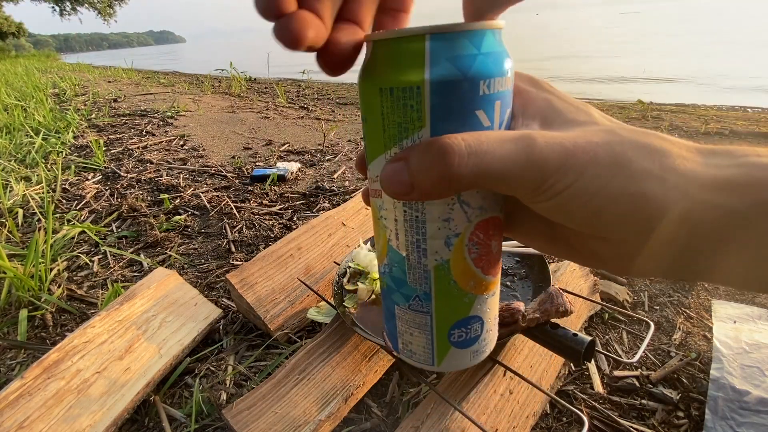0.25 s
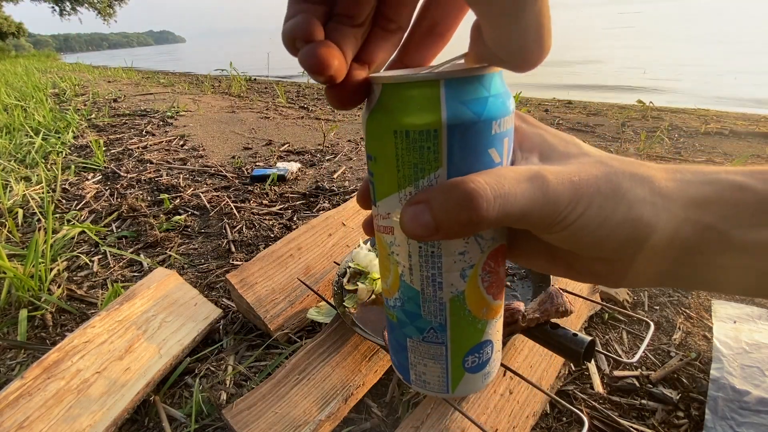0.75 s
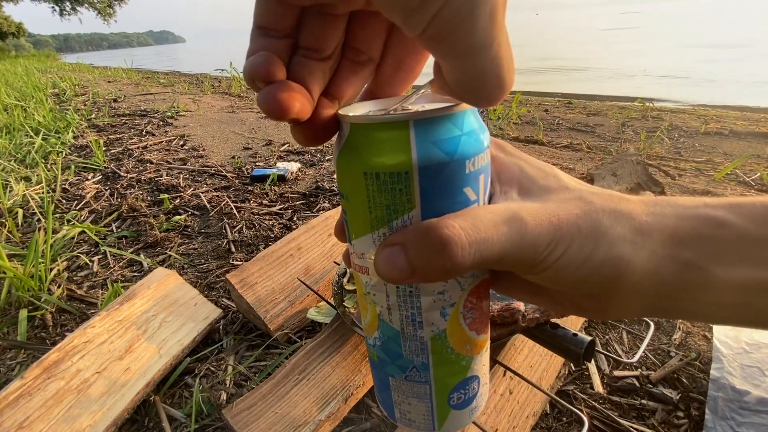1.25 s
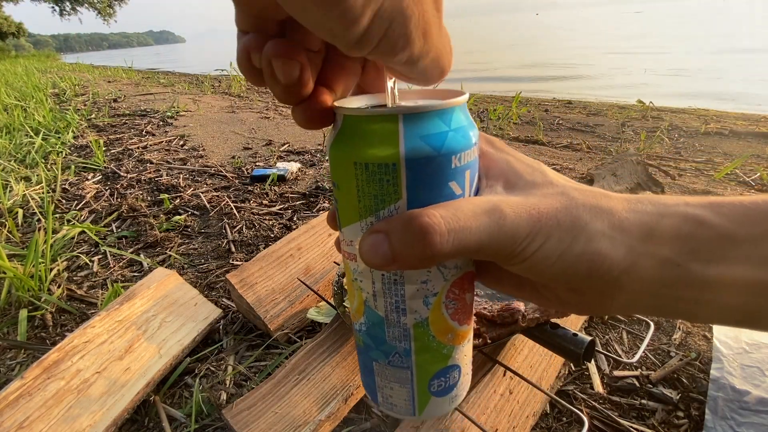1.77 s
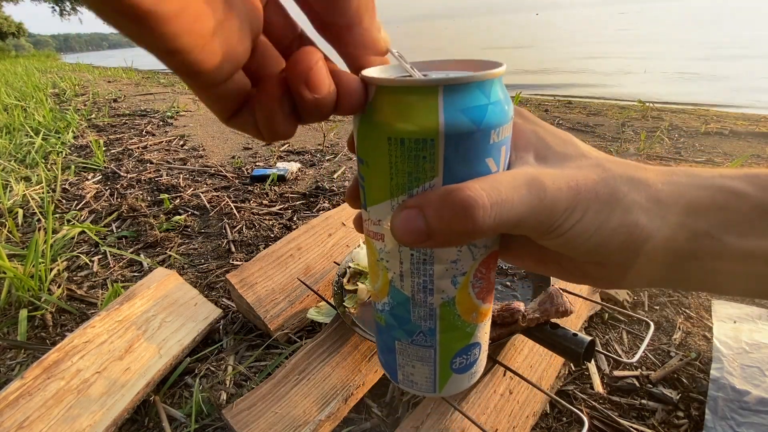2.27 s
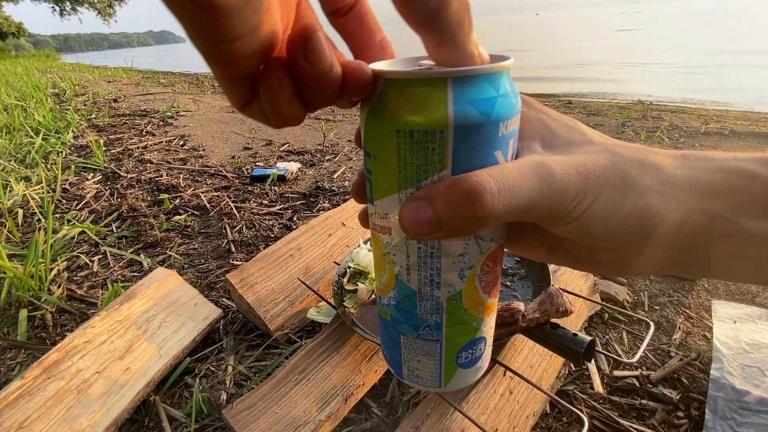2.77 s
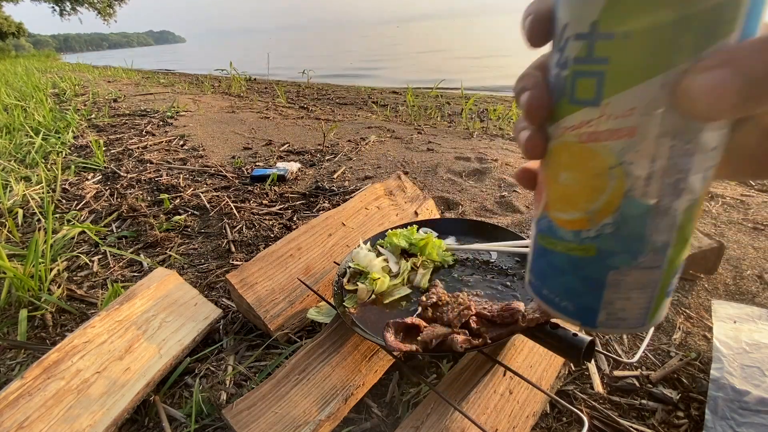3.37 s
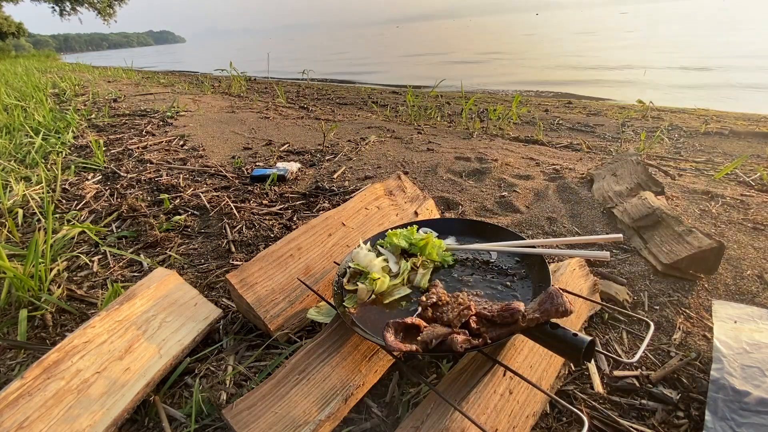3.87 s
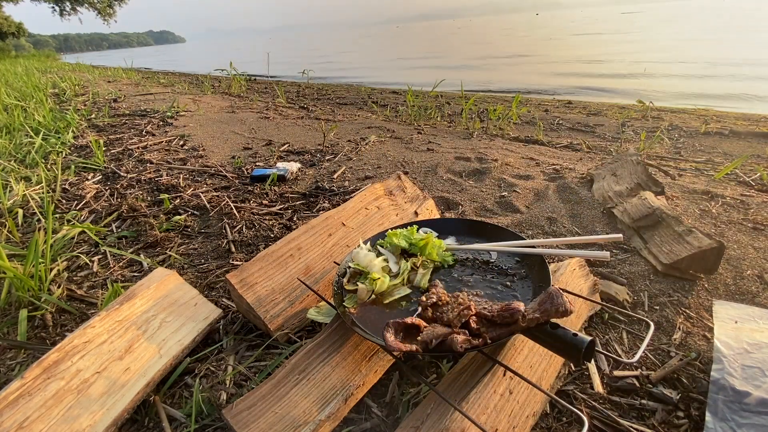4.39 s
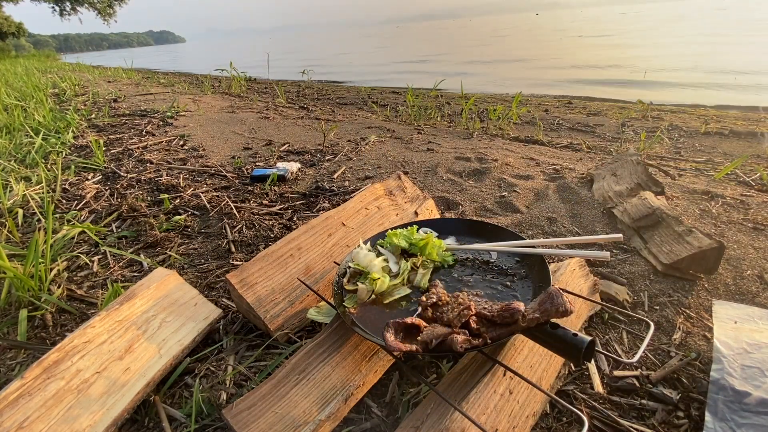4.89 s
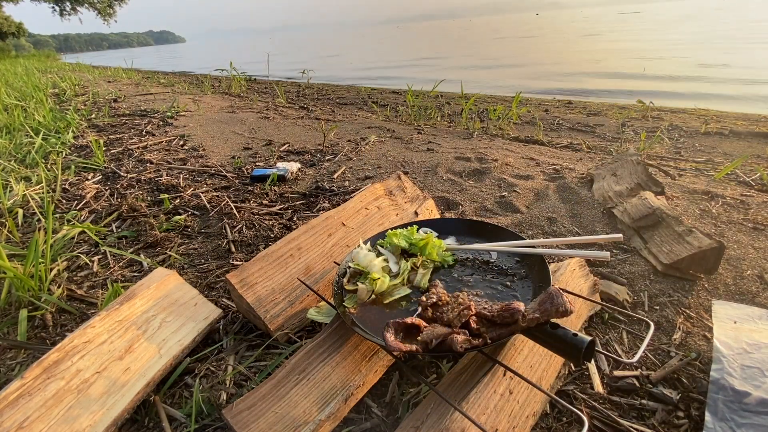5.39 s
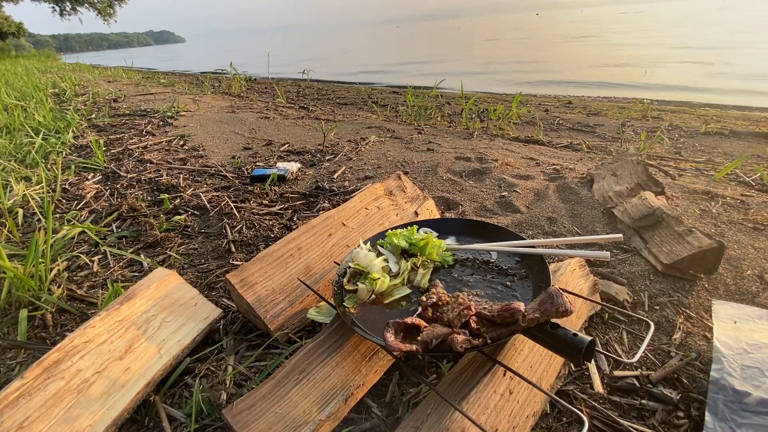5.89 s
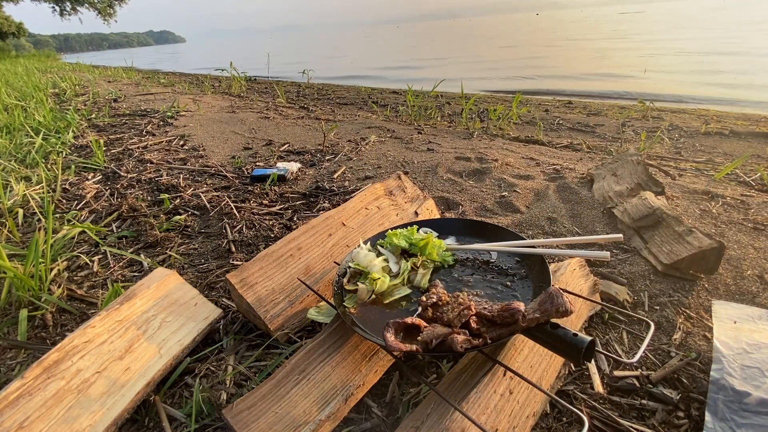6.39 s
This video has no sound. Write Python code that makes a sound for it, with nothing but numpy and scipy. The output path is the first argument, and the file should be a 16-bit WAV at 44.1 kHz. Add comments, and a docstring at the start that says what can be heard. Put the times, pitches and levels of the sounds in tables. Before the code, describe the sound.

Outdoor lake shore, stereo handheld-type pickup. Small wavelets lap and bubble softly with dry twig ticks over a low rumble. Just after one second a can tab snaps and gas spits; around half a second later come very loud crisp lid cracks, then little metal clicks. Later a few snaps, a scraping light can knock to the right, more lapping and plopping, and faint bird chirps.

```python
"""A drink can is opened by hand on a lake shore: the tab clicks, gas jets out, the lid cracks and creaks,
and the can is put down. Struck metal is made of ringing sines, gas of flickering noise bands.
Nearby, small waves lap (noise) and plop (sines climbing in pitch), and twigs tick (short noise snaps).
Far birds whistle (bending sines) over a low rumble, with a thin hiss coming up late.
Two microphone ports pick this up, and a gain control ducks after loud cracks."""
import sys
import numpy as np
from scipy import signal
from scipy.io import wavfile
from scipy.ndimage import uniform_filter1d

SR = 44100
rng = np.random.default_rng(int(sys.argv[2]) if len(sys.argv) > 2 else 0)


def log_audio(samples):
    """Write samples as a 16-bit WAV file to the path given in sys.argv[1]."""
    # one column per channel
    frames = np.atleast_2d(samples).T
    # limit to full scale, then quantise
    limited = np.clip(frames, -1, 1)
    pcm = np.round(limited * 32767).astype(np.int16)
    wavfile.write(sys.argv[1], SR, pcm)


N = 293265   # length in samples
PORT_LAG_S = 0.00022   # sound path between the two ports

# In all tables, levels are those before the gain control.
# A positive lean_db leaves the left port alone and turns the right one down by 1.76 times as many dB;
# a negative lean_db turns the left port down by that many dB.


def amp(db):
    """Turn dB into a gain."""
    return 10 ** (np.asarray(db) / 20)


def rms_one(x):
    """Scale to an rms of 1."""
    return x / np.sqrt(np.mean(x ** 2) + 1e-20)


def in_time(rows, outside=None):
    """Draw each column of a (time, values...) table as a curve with one value per sample."""
    s, *columns = np.transpose(rows)
    t = np.arange(N) / SR
    return [np.interp(t, s, column, outside, outside) for column in columns]


def at_hz(points, hz):
    """Read a (Hz, value) curve at one pitch, along a log pitch axis."""
    pitch_hz, value = np.array(points).T
    return np.interp(np.log(hz), np.log(pitch_hz), value)


def band(x, low_hz, high_hz):
    """Keep only the sound between two pitches (Butterworth band-pass)."""
    edges_hz = [low_hz, min(high_hz, 0.45 * SR)]
    return signal.sosfilt(signal.butter(2, edges_hz, "band", fs=SR, output="sos"), x)


def drift(rate_hz):
    """Random wander of rms 1: noise smoothed twice, so it slows down above rate_hz."""
    step = 40   # samples between the computed points
    r = np.exp(-2 * np.pi * rate_hz * step / SR)
    noise = rng.standard_normal(N // step + 2002)
    slow = signal.lfilter([1], [1, -2 * r, r * r], noise)[2000:]   # skip the filter's start-up
    return np.interp(np.arange(N) / step, np.arange(len(slow)), rms_one(slow))


def ring(x, hz, t60_s):
    """A resonator: a unit click makes it ring as a sine of height 1 that loses 60 dB in t60_s."""
    r = amp(-60 / (t60_s * SR))
    w = 2 * np.pi * hz / SR
    return signal.lfilter([0, np.sin(w)], [1, -2 * r * np.cos(w), r * r], x + 1e-18)


def struck(x, modes, bend=0.04, spread_db=3.5):
    """Ringing modes, each strike with new random strengths and slightly shifted pitches; rms 1."""
    total = 0
    for hz, db, t60_s in modes:
        strength, detune = rng.standard_normal(2)
        total = total + amp(db + spread_db * strength) * ring(x, hz * (1 + bend * detune), t60_s)
    return rms_one(total)


def burst(t60_s, size=3000):
    """Uneven micro-slips: random kicks that swell within a millisecond and die away."""
    t = np.arange(size) / SR
    slips = rng.standard_normal(size) * amp(5 * rng.standard_normal(size))
    swell = 1 - np.exp(-t / 0.0006)
    return slips * amp(-60 * t / max(t60_s, 0.003)) * swell


def plop(hz, t60_s, rise):
    """A bubble: a sine that swells, dies and climbs in pitch as it nears the surface."""
    t = np.arange(round(t60_s * SR)) / SR
    tone = np.sin(2 * np.pi * hz * (t + rise * t ** 2 / t60_s))
    swell = 1 - np.exp(-t / (0.16 * t60_s))
    return tone * amp(-60 * t / t60_s) * swell


def add(out, s, sound, db, lean_db, lag_s=0.0):
    """Place a sound on both ports: the louder one peaks at db, a positive lag_s delays the left one."""
    sound = sound * amp(db) / np.abs(sound).max()
    for side, sign, delay_s in ((0, 1, max(lag_s, 0)), (1, -1.76, max(-lag_s, 0))):
        at = round((s + delay_s) * SR)
        part = out[side, at:at + len(sound)]
        part += sound[:len(part)] * amp(min(sign * lean_db, 0))


# how alike the two ports hear noise: pitch_hz, likeness (1 same, 0 unrelated, -1 opposite)
PORT_LIKENESS = [(60, 0.88), (130, 0.85), (290, 0.082), (640, -0.8), (1500, -0.15), (8000, -0.056),
                 (15000, 0.52)]


def coloured(spectrum, patchy_db, rate_hz):
    """Stereo noise built from bands about 0.4 octave wide, each flickering by itself; rms 1."""
    octaves = np.log2(spectrum[-1][0] / spectrum[0][0])
    edges_hz = spectrum[0][0] * 2 ** np.linspace(0, octaves, int(octaves * 2.5) + 2)
    white = rng.standard_normal((2, 2, N))   # neighbouring bands take turns between two noises
    out = 0
    for k, (low_hz, high_hz) in enumerate(zip(edges_hz, edges_hz[1:])):
        shared, opposed = band(white[k % 2], low_hz, high_hz)
        hz = np.sqrt(low_hz * high_hz)
        alike = np.clip(at_hz(PORT_LIKENESS, hz), -1, 1)
        gain = amp(at_hz(spectrum, hz) + patchy_db * drift(rate_hz))
        stereo = np.sqrt(1 + alike) * shared + np.sqrt(1 - alike) * opposed * [[1], [-1]]
        out = out + gain * stereo
    return rms_one(out)


SLIDE_FROM_S, SLIDE_TO_S, SLIDE_RISE_S, SLIDE_DB = 0.69, 1.4, 0.19, -59


def finger_slide():
    """A finger feels for the tab: soft hiss from 2900 to 4700 Hz that rises, then holds."""
    rise = [(SLIDE_FROM_S, SLIDE_DB - 18), (SLIDE_FROM_S + SLIDE_RISE_S, SLIDE_DB), (SLIDE_TO_S, SLIDE_DB)]
    level_db, = in_time(rise, outside=-150)
    return amp(level_db) * rms_one(band(rng.standard_normal((2, N)), 2900, 4700))


LID_OPEN_S = 1.75   # from here the hollow speaks through the hole
SHUT_THUD, OPEN_THUD = 9, 1   # rms of the broad thud beside the hollow's ring, lid shut and open
HOLLOW_BEND = 0.04   # share by which the hollow's pitch strays from crack to crack
FAR_PORT_LID_DB = -16   # the lid faces the left port

# cracks of finger, tab and lid, with peak levels:
# start_s, lid_db, snap_db, hollow_db, push_db, chatter_t60_s (time to fade by 60 dB)
CRACKS = [(1.073, -3.5, -9, -62, -64, 0.021), (1.352, -46, -52.5, -37, -41.5, 0.016),
          (1.576, -22, -23, -24, -42, 0.011), (1.5805, -2.5, -6, 1, -12, 0.0086),
          (1.5847, -13, -34, -35, -32, 0.0062), (1.6069, -30.5, 1, -5, -52, 0.043),
          (1.6091, 3, -2, -19, -50, 0.009), (1.624, -16.5, -10, -22, -43, 0.018),
          (1.718, -33, -36, -29.5, -48, 0.026), (1.7314, -23, -28, -25, -29, 0.016),
          (1.7403, 3.5, 3.5, -14, -53.5, 0.033), (1.7454, 9.5, 1, 7, -16, 0.009),
          (1.7614, -42, -6, -23, -57.5, 0.016), (1.7683, -15.5, -9, -29, -47, 0.016),
          (1.7788, -15.5, -17, -25, -57, 0.052), (1.795, -26, -25, -32, -70, 0.016),
          (1.8124, -34, -40.5, -32, -70, 0.027), (1.839, -36, -41, -24, -70, 0.04),
          (1.8492, -26.5, -28.5, -31.5, -69, 0.047), (1.901, -23, -50.5, -20, -71, 0.016),
          (1.9647, -37, -34, -31.5, -66, 0.027), (1.9698, -15, -20, -27.5, -67, 0.027),
          (2.0695, -59, -64, -41, -66, 0.014), (2.0786, -26, -20.5, -22, -58.5, 0.013),
          (2.2142, -53, -59, -27, -67, 0.038), (2.2233, -35, -57.5, -34, -56, 0.027),
          (2.2819, -51, -66, -24.5, -69, 0.054), (2.2945, -57, -64, -29, -65, 0.017),
          (2.581, -32, -39, -30.5, -48, 0.081), (2.594, -24, -30.5, -48, -59, 0.027),
          (2.7414, -17, -15.5, -14.5, -57, 0.011), (3.3694, -38.5, -56.5, -39.5, -30.5, 0.0079)]
# ringing of the lid, around which each strike strays: pitch_hz, level_db, t60_s
LID_MODES = [(2773, -3.5, 0.022), (3280, 4, 0.025), (3940, -2, 0.013), (4560, -8, .014), (5590, -5, 0.019),
             (6230, -7.5, 0.023)]
# ringing of the air space under the lid, also strayed from: pitch_hz, level_db, t60_s
HOLLOW_MODES = [(1290, 0, .042), (1850, -7, .015)]


def tab():
    """Each crack drives the lid and the hollow below it, with a bright snap and a dull push."""
    # The can is close on the left: lows lead and are louder there, the treble comes round the other way.
    out = np.zeros((2, N))
    for s, lid_db, snap_db, hollow_db, push_db, t60_s in CRACKS:
        chatter = burst(t60_s)

        # each port faces other parts of the lid, so each gets its own strike
        rattle = 1.27 * rms_one(band(chatter, 2200, 5130))
        add(out, s, struck(chatter, LID_MODES) + rattle, lid_db, 40)
        add(out, s, struck(chatter, LID_MODES) + rattle, lid_db + FAR_PORT_LID_DB, -40, -PORT_LAG_S)

        thud_share = SHUT_THUD if s < LID_OPEN_S else OPEN_THUD
        thud = thud_share * rms_one(band(band(chatter, 1100, 2750), 700, 3000))
        hollow = struck(chatter, HOLLOW_MODES, bend=HOLLOW_BEND) + thud
        add(out, s, hollow, hollow_db, 4.2, -PORT_LAG_S)

        snap = band(chatter, 7500, 14500)
        add(out, s, snap, snap_db, -1.1, PORT_LAG_S)
        push = band(chatter, 120, 1670)
        add(out, s, push, push_db, 11, -PORT_LAG_S)
    return out


SPUTTER_T60_S = 0.027

# escaping gas, first leak then full jet, levels before flicker and port mix: time_s, jet_db, foam_db
GAS_LEVELS = [(1.115, -38, -51), (1.123, -33, -59.5), (1.133, -27, -54.5), (1.14, -18, -26.5),
              (1.146, -9.5, -29.5), (1.208, -26.5, -26), (1.218, -29, -18), (1.245, -55, -29),
              (1.262, -68, -44)]
# tone colour of the jet: pitch_hz, level_db (per Hz, relative)
JET_COLOUR = [(2940, -26.5), (5000, -22), (9150, -22), (10500, -8), (12600, -13), (13300, -12.5),
              (14900, -20.5), (16200, -11), (16500, -37)]
# tone colour of the foam: pitch_hz, level_db (per Hz, relative)
FOAM_COLOUR = [(150, -31), (250, -20.5), (663, -2.5), (806, -11), (1840, -2), (2360, 9.5), (2870, -16.5),
               (7000, -33.5), (9100, -61), (15400, -120)]
# big foam bubbles bursting at the seam: start_s, peak_db, pitch_hz (at the start)
FOAM_BUBBLES = [(1.15, -25.5, 1750), (1.164, -27, 880), (1.188, -25.5, 703), (1.194, -24, 1900),
                (1.211, -25, 627.3), (1.215, -32, 1630), (1.232, -23, 1500)]


def gas():
    """A bright jet of noise through the torn seam; foam sputters below it in lumps."""
    jet_db, foam_db = in_time(GAS_LEVELS, outside=-150)
    jet = coloured(JET_COLOUR, patchy_db=0.6, rate_hz=110) * amp(jet_db + 1.1 * drift(200))
    foam = coloured(FOAM_COLOUR, patchy_db=4.5, rate_hz=270) * amp(foam_db + 1.17 * drift(170))

    # foam reaches the left port first, the jet the right one
    lag = round(PORT_LAG_S * SR)
    left = foam[0] + np.roll(jet[0], lag + 2)
    right_foam = amp(-8) * (1.3 * np.roll(foam[0], lag) + 0.6 * foam[1])
    right = right_foam + 0.81 * jet[0] + 0.6 * jet[1]
    out = np.array([left, right])

    for s, db, hz in FOAM_BUBBLES:
        add(out, s, plop(hz, SPUTTER_T60_S, rise=0.05), db, 4, -PORT_LAG_S)
    return out


GRIT_DB = 1   # relative to the knock

# can put down: start_s, peak_db, scrape_t60_s
PUT_DOWN = [(4.37, -23.5, 0.13), (4.385, -23, 0.049), (4.393, -36, 0.14), (4.4147, -15.5, 0.12),
            (4.421, -17, 0.097), (4.437, -26, 0.07)]
# ringing of the can's wall, around which each strike strays: pitch_hz, level_db, t60_s
CAN_MODES = [(750, 0.5, 0.032), (1088, -5.5, 0.14), (1257, 2.5, 0.07), (1528, 9, 0.11), (2070, -19, .035),
             (2180, -1, 0.04), (2720, -2, 0.039), (3720, -3, 0.044), (4710, -19, 0.021)]


def knocks():
    """The can's foot meets grit off to the right: a scrape that rings the thin wall."""
    out = np.zeros((2, N))
    for s, db, t60_s in PUT_DOWN:
        scrape = band(burst(t60_s, size=9000), 750, 7000)   # a small can radiates no bass
        wall = struck(scrape, CAN_MODES, bend=0.015, spread_db=2)
        add(out, s, wall + 0.5 * rms_one(band(scrape, 800, 2200)), db, 0.1, PORT_LAG_S)
        for lean_db in (40, -40):   # the grit's crunch differs between the ports
            add(out, s, band(burst(0.49 * t60_s), 1340, 4580), db + GRIT_DB, lean_db)
    return out


SWELL_RISE_DB_PER_S, SWELL_DRAIN_DB_PER_S = 138, 125.5   # of the wash
SPRAY_SWING = 0.57   # the spray rises and drains by this share of the wash's dB

# wavelets running up the sand; the short swell at 4.39 s is noise around the can's knock:
# start_s, full_level_s (how long it holds), wash_db, spray_db
SWELLS = [(0, 0.14, -58, -67.5), (0.348, 0.22, -63, -63), (1, 0.36, -57, -64.5), (1.49, 0.19, -60.5, -61),
          (2.113, 0.041, -57.5, -79), (2.597, 0.073, -60.5, -63), (2.71, 0.092, -57, -67),
          (3.01, 0.19, -62, -69.5), (3.67, 0.23, -61, -67.5), (3.984, 0.22, -56.5, -62.5),
          (4.39, 0.054, -54.5, -57.5), (4.94, 0.24, -50.5, -55.5), (5.296, 0.032, -57, -66),
          (5.556, 0.023, -57, -62), (5.794, 0.22, -59, -67), (6.094, 0.083, -53.5, -57),
          (6.24, 0.075, -56, -55.5), (6.504, 0.17, -65, -72.5)]


def swells():
    """Wash and spray levels in dB: each swell rises, holds its full level and drains; the loudest counts."""
    s, length_s, wash_db, spray_db = np.transpose(SWELLS)[:, :, None]
    t = np.arange(0, N + 100, 100) / SR
    rise_db = SWELL_RISE_DB_PER_S * np.maximum(s - t, 0)
    drain_db = SWELL_DRAIN_DB_PER_S * np.maximum(t - s - length_s, 0)
    loss_db = rise_db + drain_db
    wash = (wash_db - loss_db).max(axis=0)
    spray = (spray_db - SPRAY_SWING * loss_db).max(axis=0)
    return in_time(np.transpose([t, wash, spray]))


BUBBLE_DB = -2.5   # relative to the swell, before each bubble's random size

# tone colour of the wash: pitch_hz, level_db (per Hz, relative)
WASH_COLOUR = [(150, -51), (250, 8.5), (384, -8), (775, -3), (1130, -8.5), (1800, -31), (2340, -68),
               (3960, -120)]
# tone colour of the spray: pitch_hz, level_db (per Hz, relative)
SPRAY_COLOUR = [(1200, -13), (1700, -5.5), (2600, -3), (4000, -10), (7500, -9.5)]
# air trapped at the water's edge: start_s, peak_db, pitch_hz (at the start), t60_s, lean_db
BIG_PLOPS = [(0.084, -36.5, 594, 0.027, -31), (0.149, -51, 1270, 0.033, 12), (0.283, -45, 1340, 0.067, -2),
             (0.353, -39.5, 1110, 0.024, -8), (0.491, -42.5, 570, 0.058, -6), (0.543, -30.5, 513, 0.01, -6),
             (1.459, -46.5, 948, 0.046, -9), (1.495, -46.5, 888, 0.037, -7),
             (2.117, -38.5, 970, 0.03, -5.5), (2.121, -42.5, 213.4, 0.071, 0),
             (2.64, -45.5, 358, 0.052, -11), (2.717, -42, 1350, 0.038, 19), (2.79, -42.5, 1350, 0.037, 6.5),
             (2.793, -53, 744, 0.047, -2), (2.809, -49, 1167, 0.028, -11), (3.084, -45, 1250, 0.027, 1.5),
             (3.14, -50, 500, 0.021, -8), (3.564, -52.5, 800, 0.022, -1), (3.791, -45, 1326, 0.04, 8.5),
             (3.99, -45.5, 564, 0.025, -2), (4.015, -54, 2030, 0.021, 1), (4.031, -41.5, 1150, .03, 3),
             (4.077, -50, 1810, 0.024, -0.5), (4.119, -42, 1340, 0.018, 16),
             (4.795, -52.5, 1046, 0.069, 12), (4.846, -46, 1570, 0.034, 2.5), (4.93, -31, 545, .032, -0.5),
             (4.933, -36, 216.5, 0.078, 0), (4.959, -41.5, 392, .028, 3), (4.961, -43, 217, .1, 0),
             (5.06, -39, 1700, 0.024, 2.5), (5.08, -46, 1640, 0.027, -4), (5.128, -35, 365, 0.018, 0),
             (5.152, -49, 375, 0.06, 3), (5.179, -45.5, 485, .04, -5), (5.18, -48, 1860, 0.023, -3),
             (5.324, -42, 706, 0.033, -8), (5.568, -43, 1020, 0.06, 6), (5.697, -49.5, 550, 0.068, -8),
             (5.822, -44, 515, 0.016, 0.5), (5.825, -47, 1090, 0.047, -10), (5.858, -55, 1120, .062, -18),
             (5.898, -43.5, 1125, .035, -11), (6.268, -36, 1105, 0.033, 6), (6.367, -39.5, 494, 0.021, 3)]


def water():
    """Wash and spray noise follow the swells; small bubbles fall at random in clumps, big ones are listed."""
    wash_db, spray_db = swells()
    clumps_db = 3.63 * drift(6)
    wash = amp(wash_db) * coloured(WASH_COLOUR, patchy_db=0.4, rate_hz=19)
    spray = amp(spray_db) * coloured(SPRAY_COLOUR, patchy_db=5.5, rate_hz=23.5)
    out = wash + spray

    for when, pitch, size, side in rng.random((1100, 4)):
        hz = 480 * 7 ** pitch
        at = int(when * N)
        # high-pitched, small bubbles follow the spray, low ones the wash
        swell_db = (1 - pitch) * wash_db[at] + pitch * spray_db[at] + clumps_db[at]
        db = swell_db + BUBBLE_DB - 3.1 * np.log(size + 0.05)
        add(out, when * N / SR, plop(hz, 15.5 / hz, rise=0.17), db, 8 * (side - 0.5), 0.0006 * side)

    for s, db, hz, t60_s, lean_db in BIG_PLOPS:
        splash = band(burst(1.5 * t60_s), 0.22 * hz, 1.45 * hz)
        add(out, s, plop(hz, max(t60_s, 0.005), rise=0.089), db, lean_db, 2 * PORT_LAG_S)
        add(out, s, splash, db - 2.5, lean_db, 2 * PORT_LAG_S)
    return out


TICK_T60_S = 0.022
FAINT_TICK_DB = -54   # middle of an 8 dB spread
FAINT_TICK_HZ = 2400   # lowest pitch of a 1.5 octave spread

# twigs and grit: start_s, peak_db, pitch_hz, lean_db
LOUD_TICKS = [(0.0465, -35.5, 5890, 3), (0.0585, -33.5, 1860, 20), (0.2451, -24, 11500, -4.5),
              (0.2545, -28.5, 3100, -21), (0.2647, -25.5, 4010, 1.5), (0.282, -34, 3570, -6),
              (0.465, -48, 3390, -4), (0.5413, -41, 3700, 1), (2.816, -42.5, 4840, 2),
              (2.9133, -38, 11500, 0.5), (3.8288, -37.5, 4740, 1.5), (3.8458, -25.5, 7650, 0.5),
              (3.8573, -21.5, 3700, 4), (3.8682, -26, 3790, 1), (3.8778, -33, 3800, -11),
              (3.884, -38, 3830, 3), (4.2142, -41, 3500, -0.5), (4.503, -42, 4760, 4),
              (5.3202, -31, 3820, 11), (6.101, -28, 7230, -3), (6.277, -36.5, 2530, 15),
              (6.3004, -39.5, 3970, 8), (6.4952, -39, 7000, -6)]


def ticks():
    """Dry noise snaps, each strongest around one pitch: loud ones are listed, faint ones fall at random."""
    out = np.zeros((2, N))
    faint = []
    for when, size, pitch, side in rng.random((12, 4)):
        db = FAINT_TICK_DB + 8 * (size - 0.5)
        hz = FAINT_TICK_HZ * 2 ** (1.5 * pitch)
        faint.append((when * N / SR, db, hz, 8 * (side - 0.5)))
    for s, db, hz, lean_db in LOUD_TICKS + faint:
        snap = burst(TICK_T60_S)
        pitched = band(snap, 0.877 * hz, 1.041 * hz)
        add(out, s, pitched + 0.19 * band(snap, 1170, 8900), db, lean_db, PORT_LAG_S)
    return out


WHISTLE_SWELL = 0.43   # power of the sine arch that shapes each note

# bird whistles: start_s, length_s, first_hz, middle_hz, last_hz,
# level_db (rms at the top of the swell, before the waver, echo and left-right balance)
WHISTLES = [(.69, 0.035, 4350, 3820, 3600, -65), (3.5, 0.11, 7100, 7020, 6830, -75),
            (4.13, 0.073, 9600, 9750, 10300, -72), (4.21, .042, 9850, 9500, 8800, -65),
            (4.25, 0.062, 8750, 9450, 9400, -67), (4.3, 0.042, 9200, 9300, 8300, -65.5),
            (5.648, 0.035, 4440, 3860, 3540, -64), (5.95, 0.078, 3600, 4080, 4340, -62.5),
            (6.005, .07, 4450, 4560, 3700, -62), (6.165, .025, 4240, 3900, 3520, -69),
            (6.37, .03, 5800, 5340, 5100, -67), (6.4, 0.021, 4600, 4700, 5100, -64),
            (6.52, 0.052, 5470, 5060, 4550, -68.5), (6.55, 0.063, 7300, 7170, 7140, -66.5)]


def birds():
    """Thin far whistles that bend through three pitches, waver and come back off the water as a blurred echo."""
    notes = np.zeros(N)
    for s, length_s, first_hz, middle_hz, last_hz, db in WHISTLES:
        u = np.linspace(0, 1, round(length_s * SR))
        bend = np.polyfit([0, 0.5, 1], [first_hz, middle_hz, last_hz], deg=2)
        tone = np.sin(2 * np.pi * np.cumsum(np.polyval(bend, u)) / SR)
        swell = np.abs(np.sin(np.pi * u)) ** WHISTLE_SWELL
        at = round(s * SR)
        notes[at:at + len(u)] += np.sqrt(2) * amp(db) * swell * tone
    notes = notes * amp(4.5 * drift(80))
    echoes = 0.3 * np.roll(notes, round(0.006 * SR)) + 0.15 * np.roll(notes, round(0.014 * SR))
    return (notes + echoes) * amp([[1.5], [-1.5]])


AIR_DB = -48   # before the left-right balance

# tone colour of the background air, mostly low rumble: pitch_hz, level_db (per Hz, relative)
AIR_COLOUR = [(16, -38), (28, 2), (75, 0), (146, -5.5), (172, -3.5), (213, -9), (383, -22), (900, -32.5),
              (1080, -33), (1420, -33), (1620, -36), (3150, -35.5), (12000, -36.5), (15200, -41.5),
              (16500, -58)]


def air():
    """Background rumble: gently flickering noise, strongest in the bass and a little louder on the left."""
    return amp(AIR_DB) * coloured(AIR_COLOUR, patchy_db=1.5, rate_hz=13.2) * amp([[1.1], [-1.1]])


TOP_HISS_FROM_S, TOP_HISS_RISE_S, TOP_HISS_DB = 3.48, 0.25, -65


def top_hiss():
    """A smooth narrow hiss in the top treble: very faint at first, it comes up by 22 dB and stays."""
    level_db, = in_time([(TOP_HISS_FROM_S, TOP_HISS_DB - 22), (TOP_HISS_FROM_S + TOP_HISS_RISE_S, TOP_HISS_DB)])
    return amp(level_db) * rms_one(band(rng.standard_normal((2, N)), 10270, 11960))


def scene():
    """Add up the can, the shore and the air."""
    can = tab() + finger_slide() + gas() + knocks()
    shore = water() + ticks() + birds()
    return can + shore + air() + top_hiss()


DUCK_FROM_DB = -26   # levels above this are turned down
DUCK_SHARE = 0.98   # by this share of the dB above it
ATTACK_S, RELEASE_DB_PER_S = 0.025, 80
CEILING = 0.82   # peaks are rounded off towards this height
RUMBLE_CUT_HZ, TOP_CUT_HZ = 36, 17100


def record(dry):
    """Gain control ducks a little late and recovers steadily; peaks are rounded, rumble and top are cut."""
    # level below the treble over the last 8 ms, at the louder port
    power = uniform_filter1d((band(dry, 100, 3600) ** 2).max(axis=0), size=350, origin=174)
    level_db = 10 * np.log10(np.abs(power) + 1e-12)
    over_db = DUCK_SHARE * np.maximum(level_db - DUCK_FROM_DB, 0)

    # hold each peak and let it sink at the release rate
    ramp = RELEASE_DB_PER_S * np.arange(N) / SR
    held_db = np.maximum.accumulate(over_db + ramp) - ramp
    r = np.exp(-1 / (ATTACK_S * SR))
    duck_db = signal.lfilter([1 - r], [1, -r], held_db)

    rounded = CEILING * np.tanh(dry * amp(-duck_db) / CEILING)
    no_rumble = signal.sosfilt(signal.butter(8, RUMBLE_CUT_HZ, "high", fs=SR, output="sos"), rounded)
    return signal.sosfilt(signal.cheby2(12, 70, TOP_CUT_HZ, fs=SR, output="sos"), no_rumble)


dry = scene()
out = record(dry)
log_audio(out)
```